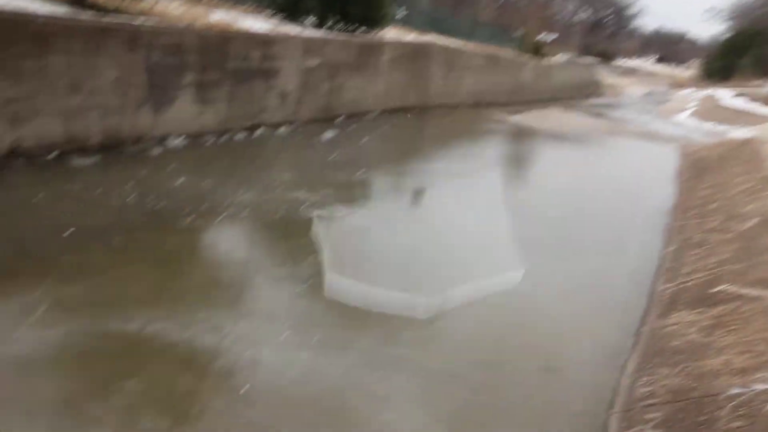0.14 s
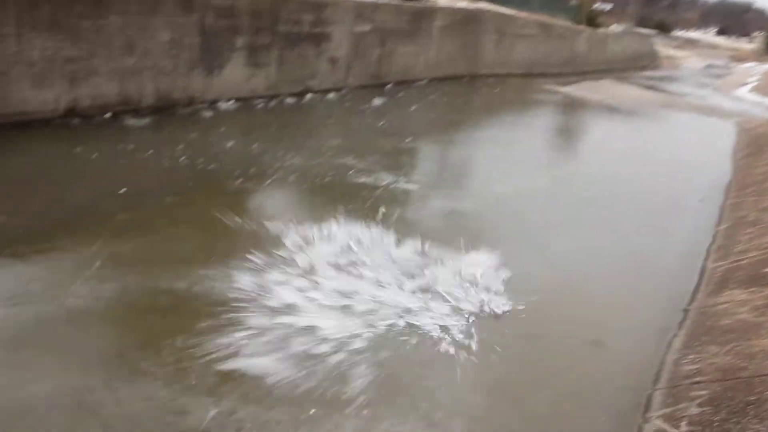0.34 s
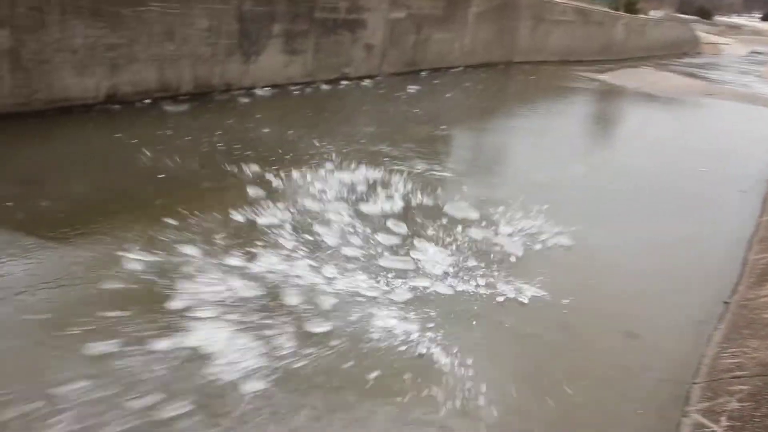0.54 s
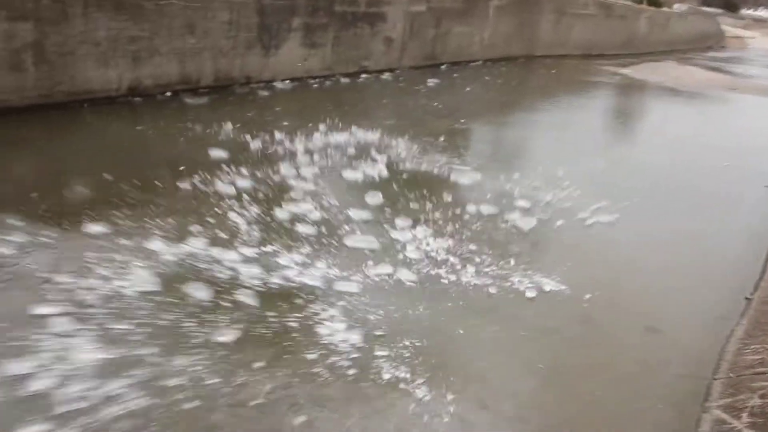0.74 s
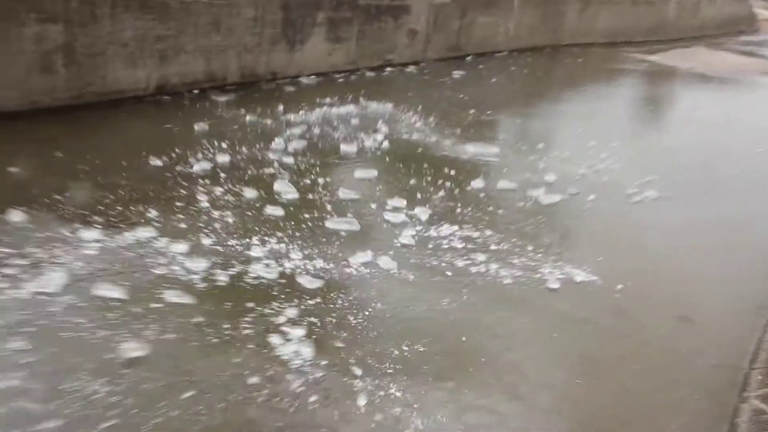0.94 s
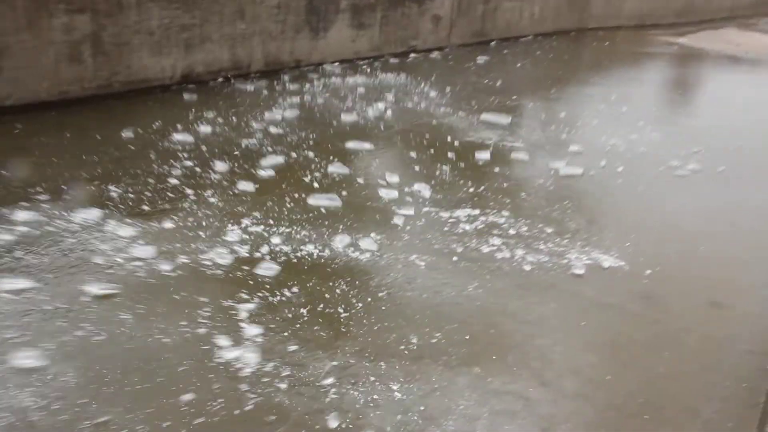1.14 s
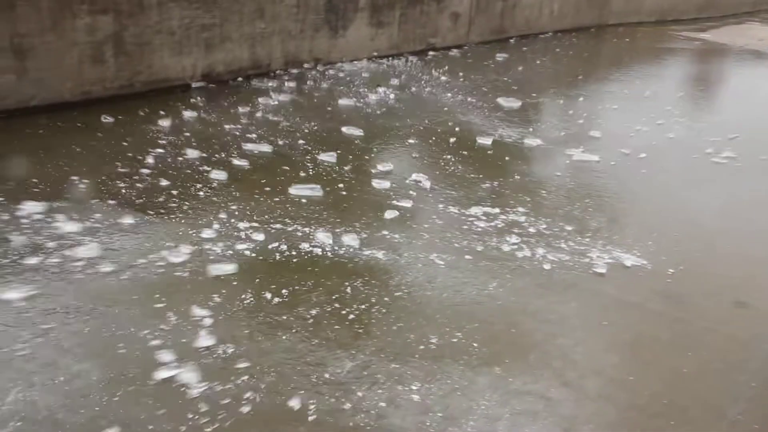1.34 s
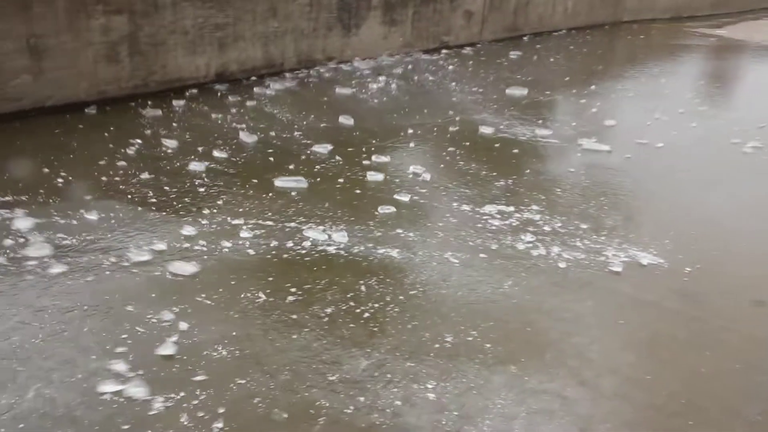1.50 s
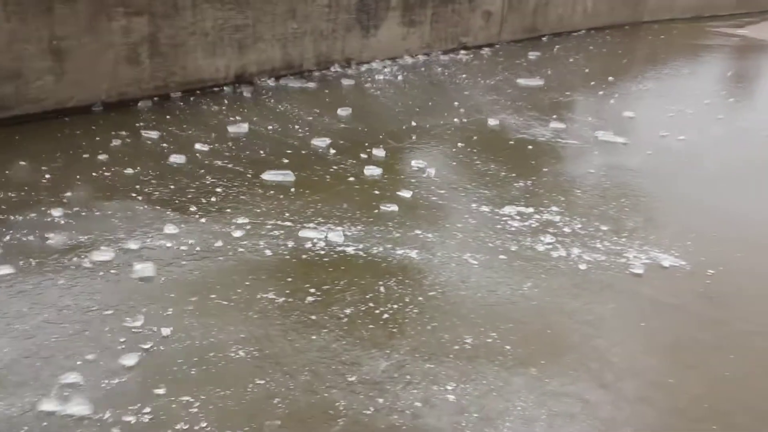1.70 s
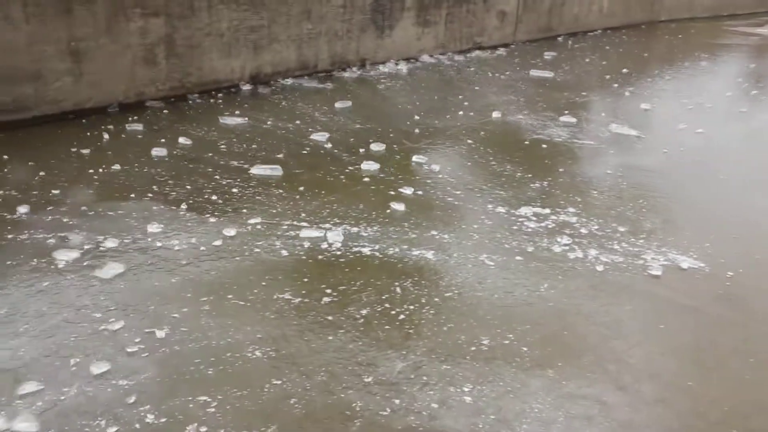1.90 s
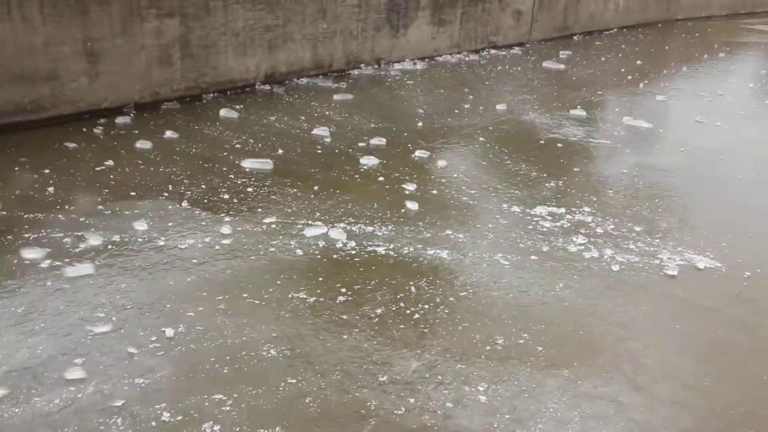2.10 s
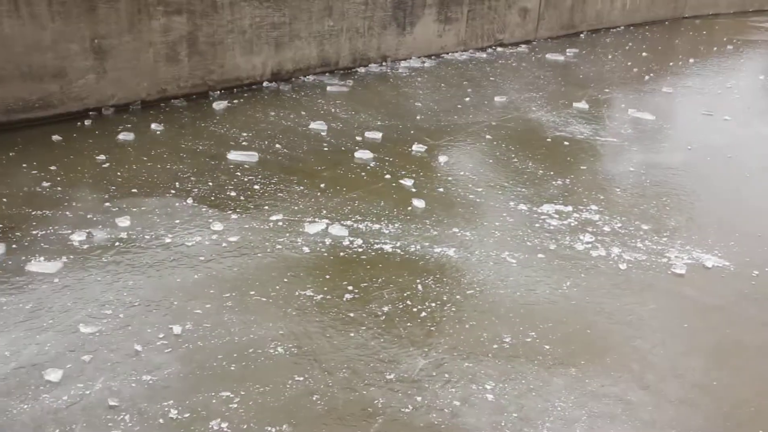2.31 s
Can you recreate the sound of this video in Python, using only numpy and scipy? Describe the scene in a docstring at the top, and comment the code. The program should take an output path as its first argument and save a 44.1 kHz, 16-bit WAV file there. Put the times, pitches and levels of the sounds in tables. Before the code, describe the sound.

A large ice sheet smashes onto a frozen creek: a hard thud and crunching burst of cracks, then bright shards spray, tick, tinkle and knock across the ice; outdoors beside a concrete bank, close microphone with clipped peaks.

```python
"""A big sheet of ice slams onto a frozen creek, a sum of damped modes under a noise burst, and cracks up.
Each crack is a short pressure push with gritty noise, over a crunch of random grains and ringing slabs.
Fragments spray on: dense grains hiss and tick, chunks knock, pieces skid, shards ping and splinters snap.
A concrete bank answers faintly as decaying noise, and air rumbles at the microphone.
The level dips briefly near the end; the recorder clips the peaks and cuts the highest treble."""
import sys
import numpy as np
from scipy import signal
from scipy.fft import rfft, irfft, next_fast_len
from scipy.io import wavfile
from scipy.ndimage import uniform_filter1d, map_coordinates

SR = 44100
rng = np.random.default_rng(int(sys.argv[2]) if len(sys.argv) > 2 else 0)


def generate_wav(sig):
    """Save sig (samples, or channels by samples) to the path in sys.argv[1] as 16-bit PCM at SR."""
    pcm = np.round(np.clip(np.atleast_2d(sig).T, -1, 1) * 32767).astype(np.int16)
    wavfile.write(sys.argv[1], SR, pcm)


N = 103635  # samples
TOP_HZ = 15850  # upper band limit


def amp(db):
    """Level law: decibels to an amplitude ratio."""
    return 10 ** (np.asarray(db) / 20)


def unit(x):
    """Normalisation to an rms of 1."""
    return x / np.sqrt(np.mean(x ** 2) + 1e-20)


def clock(start=0):
    """Time axis: seconds since start, zero before it."""
    return np.maximum(np.arange(N) / SR - start, 0)


def curves(rows):
    """Linear interpolation: one value per sample for each column after the time."""
    seconds, *columns = np.transpose(rows)
    return [np.interp(clock(), seconds, column) for column in columns]


def wobble(rate):
    """Interpolated noise: a smooth random curve with rate knots a second."""
    return map_coordinates(rng.standard_normal(4096), [clock() * rate], mode="wrap")


def colour(x, points):
    """Minimum-phase filtering: a causal filter with the gain of (Hz, dB) points."""
    size = 2 * next_fast_len(N)
    hz, db = np.transpose(points)
    log_hz = np.log(np.fft.rfftfreq(size, 1 / SR) + 1)
    gain_db = np.interp(log_hz, np.log(hz), db)
    cepstrum = irfft(np.log(amp(gain_db)), size)
    # folding the cepstrum onto positive time makes the filter causal
    cepstrum[1:size // 2] *= 2
    cepstrum[size // 2 + 1:] = 0
    return irfft(rfft(x, size) * np.exp(rfft(cepstrum)), size)[:N]


def add(out, s, sound):
    """Superposition: mix a sound in at time s."""
    i = max(round(s * SR), 0)
    out[i:i + len(sound)] += sound[:max(N - i, 0)]


def ring(t, hz, t60):
    """Modal decay: one sine that falls 60 dB in t60 seconds."""
    return np.sin(2 * np.pi * hz * t) * amp(-60 * t / t60)


def grains(rate, low_hz, high_hz, cycles, spread_db, size=400):
    """Random impacts: rate tiny damped collisions a second, of varied pitch, life and strength; rms 1."""
    u = rng.random((16000, 4))[:int(rate * N / SR)]
    hz = np.minimum(low_hz * (high_hz / low_hz) ** u[:, 1:2], SR / 2)
    life = cycles / hz * np.exp(2 * u[:, 2:3] - 1)
    strength = amp(-spread_db * np.log(u[:, 3:] + 0.0099)) * np.sqrt(hz)
    waves = strength * ring(np.arange(size) / SR, hz, life)
    at = (u[:, :1] * N).astype(int) + np.arange(size)
    return unit(np.bincount(at.ravel(), waves.ravel(), N)[:N])


def knocks(rows, cycles, grit_t60, grit_colour):
    """Contact impulse: each is a push of a cycle or two, then a short spit of crushed ice."""
    push, spit = np.zeros(N), np.zeros(N)
    t = np.arange(-SR // 200, SR // 20) / SR
    for s, db, hz, grit_db in rows:
        turns = hz * t
        # the push rises twice as fast as it fades
        shape = np.exp(-np.abs(turns) / np.where(turns < 0, cycles / 2, cycles))
        add(push, s + t[0], amp(db) * shape * np.cos(2 * np.pi * turns))
        rise = np.exp(np.minimum(t, 0) / 0.00098)
        add(spit, s + t[0], amp(db + grit_db - 60 * np.maximum(t, 0) / grit_t60) * rise)
    push = signal.sosfilt(signal.butter(2, 520, "highpass", fs=SR, output="sos"), push)
    return push + spit * unit(colour(rng.standard_normal(N), grit_colour))


# Modes of the struck creek ice. Each row: frequency in Hz, relative level in dB, t60 in seconds.
CREEK_MODES = [(86, -14, 0.036), (158.4, -6, 0.064), (211, 4.5, 0.03), (516, 1.5, 0.025)]
# Spectrum of the bursting sheet. Each row: frequency in Hz, gain in dB.
BURST_COLOUR = [(300, -18), (900, 1.5), (2300, 5), (4500, -2), (9000, -17.5), (16000, -23)]
SLAM_S, BEND_LAG_S, THUD_ATTACK_S = .1982, .0037, 0.00069  # lag of a 1 kHz bending wave
BURST_S, BURST_DB, BURST_HOLD_S, BURST_T60 = .2047, 6.5, 0.0015, 0.016


def slam():
    """Bending-wave dispersion: the creek ice thuds, its lowest mode last, and the sheet bursts as noise."""
    thud = np.zeros(N)
    for hz, db, t60 in CREEK_MODES:
        t = clock(SLAM_S + BEND_LAG_S * np.sqrt(1000 / hz))
        thud += amp(db + 3) * ring(t, hz, t60) * (1 - np.exp(-t / THUD_ATTACK_S))
    burst = unit(colour(rng.standard_normal(N), BURST_COLOUR)) * (clock(BURST_S) > 0)
    return thud + burst * amp(BURST_DB - 60 * clock(BURST_S + BURST_HOLD_S) / BURST_T60)


# Slabs snap off and slap down.
# Each row: time in seconds, level of the push in dB, pitch in Hz, grit in dB relative to the push.
SLAB_CRACKS = [(.2005, -14, 740, -23), (.2148, -0.5, 1620, -7), (.2195, -3.5, 1600, -10),
               (0.2309, -5.5, 1750, -15), (.2342, -4.5, 1840, -17), (0.2386, -4.5, 1570, -12),
               (.2447, -16, 1900, -14), (.2587, -6.5, 1290, -4.5), (0.2647, -3.5, 1020, -13.5),
               (.2765, -14, 2200, -10), (.2858, -4.5, 920, -8), (0.3032, -9, 1710, -10),
               (0.3192, -10, 1330, -6), (.3305, -11.5, 2130, -4), (.3392, -9, 900, -6),
               (.3578, -14.5, 3320, -8)]
# Spectrum of the dense crunch. Each row: frequency in Hz, gain in dB.
CRUNCH_COLOUR = [(60, -37), (130, -15), (240, -4), (350, -10), (480, -14), (900, -3.5), (1700, -3.5),
                 (2500, 2), (5500, -6), (8000, -4.5), (12000, -3), (16000, -24)]
# Spectrum of the crumbling edges. Each row: frequency in Hz, gain in dB.
CRUMBLE_COLOUR = [(150, -35), (500, -12), (900, 0.5), (2200, 2), (5000, -6.5), (12000, -23)]
# Ringing modes of the slabs. Each row: frequency in Hz, relative level in dB, t60 in seconds.
SLAB_MODES = [(790, 0, .18), (896, 0, .18), (940, 4, .22), (980, 2.5, .25), (1590, 1, .16), (1694, 1, .16),
              (2301, 8, 0.13)]
CRUNCH_DB, CRUNCH_FALL_DB_PER_S = -22, 52
CRUNCH_END_S, CRUNCH_RELEASE_DB_PER_S = 0.308, 258  # the extra fall after the end
CRUMBLE_DB, CRUMBLE_LEAD_S, CRUMBLE_TAIL_S = -15, 0.0012, .004  # level relative to each crack


def break_up():
    """Brittle fracture exciting modes: slabs crack over a crunch, crumble at each break and ring briefly."""
    now, t = clock(), clock(BURST_S)
    started = t > 0
    level_db = CRUNCH_DB - CRUNCH_FALL_DB_PER_S * t - CRUNCH_RELEASE_DB_PER_S * clock(CRUNCH_END_S)
    crunch = grains(rate=4000, low_hz=203, high_hz=16000, cycles=1.6, spread_db=3.5)
    crunch = unit(colour(crunch, CRUNCH_COLOUR)) * started * amp(level_db)

    crushing = np.zeros(N)
    for s, db, _, _ in SLAB_CRACKS:
        crushing += amp(db) * np.exp(np.minimum((now - s) / CRUMBLE_LEAD_S, (s - now) / CRUMBLE_TAIL_S))
    crumble = grains(rate=6000, low_hz=600, high_hz=9000, cycles=4.6, spread_db=2.5)
    crumble = unit(colour(crumble, CRUMBLE_COLOUR)) * started * crushing * amp(CRUMBLE_DB)

    grit = [(80, -34), (800, -0.5), (2500, 1.0), (5000, -5.5), (8000, -14), (16000, -17)]  # (Hz, dB)
    cracking = crunch + crumble + knocks(SLAB_CRACKS, cycles=1.1, grit_t60=0.019, grit_colour=grit)
    modes = sum(amp(db) * ring(now[:SR // 2], hz, t60) for hz, db, t60 in SLAB_MODES)
    ringing = signal.fftconvolve(cracking, modes / np.linalg.norm(modes))[:N]
    return cracking + amp(-23.5) * ringing


def patches(x, patchy_db):
    """Random spectral modulation: each time-frequency patch swells and fades within milliseconds."""
    spectrum = signal.stft(x, nperseg=256)[2]
    field = uniform_filter1d(rng.standard_normal(spectrum.shape), size=5, axis=0)
    field = uniform_filter1d(field, size=4, axis=1)
    return unit(signal.istft(spectrum * amp(patchy_db * unit(field)), nperseg=256)[1][:N])


# Course of the spray.
# Each row: time in seconds, mean level of the clatter in dB, mean level of the treble in dB.
SPRAY_LEVELS = [(.3, -57, -61.5), (.39, -38.5, -40.5), (.48, -33, -37), (.6, -31, -26.5), (.72, -27, -23.5),
                (.89, -29.5, -25.5), (1.0, -27, -23), (1.12, -30.5, -23.5), (1.2, -25.5, -21.5),
                (1.42, -29.5, -23.5), (1.56, -27.5, -23.5), (1.64, -30.5, -26.5), (1.71, -27, -21.5),
                (1.86, -32, -28), (1.96, -29.5, -26), (2.15, -32.5, -27.5), (2.35, -30, -29)]
# Spectrum of the bigger bits. Each row: frequency in Hz, gain in dB.
CLATTER_COLOUR = [(100, -35), (220, -15), (350, -17.5), (600, -9.5), (930, 1), (1450, -2.5), (2300, 1.66),
                  (3300, -2), (5000, -1.5), (8000, -7), (16000, -43)]
# Spectrum of the crumbs. Each row: frequency in Hz, gain in dB.
FIZZ_COLOUR = [(1000, -17), (3000, 0.5), (5000, -6), (7000, -4), (9000, -2), (11800, 2), (14000, 0),
               (16000, -1.5)]
CHIPS_DB = -11.5  # coin-sized chips, relative to the clatter


def spray():
    """Superposed random impacts: bits clatter and chips clink, while crumbs tick, tinkle and hiss."""
    clatter_db, fizz_db = curves(SPRAY_LEVELS)
    bits = grains(rate=3500, low_hz=405.0, high_hz=9030, cycles=8.7, spread_db=3.0)
    bits = bits + amp(-2.5) * rng.standard_normal(N)
    chips = grains(rate=130, low_hz=1850, high_hz=6990, cycles=61, spread_db=3.5, size=1200)
    ticks = grains(rate=2500, low_hz=3940, high_hz=15200, cycles=6.1, spread_db=4.5)
    tinkle = grains(rate=1300, low_hz=4520, high_hz=15920, cycles=65, spread_db=4.0)
    crumbs = ticks + amp(-1.5) * tinkle + amp(0.5) * rng.standard_normal(N)
    clumps_db = 1.05 * wobble(130)
    clatter = patches(colour(bits, CLATTER_COLOUR), patchy_db=1.0) + amp(CHIPS_DB) * chips
    fizz = patches(colour(crumbs, FIZZ_COLOUR), patchy_db=0.9)
    return clatter * amp(clatter_db + clumps_db) + fizz * amp(fizz_db + clumps_db)


# Chunks land on the ice.
# Each row: time in seconds, level of the push in dB, pitch in Hz, grit in dB relative to the push.
CHUNK_LANDINGS = [(.566, -14, 2260, -16), (.757, -9.5, 2710, -11), (.774, -12, 2600, -7),
                  (1.174, -12, 2500, -2.5), (1.220, -6.5, 2720, -10), (1.259, -14, 2230, 0),
                  (1.2663, -10, 2050, -7), (1.2693, 0.5, 3730, -20), (1.2795, -10, 1260, -10),
                  (1.312, -6, 2620, -22), (1.358, -8.5, 4800, -13.5), (1.366, -7.5, 1940, -12),
                  (1.5557, -11, 2420, -3.5), (1.604, -12, 3400, -19), (1.615, -12, 2300, -13),
                  (1.699, -8.5, 2650, -7.5), (1.755, -11, 1500, -4.5), (1.771, -5.5, 2570, -9.5),
                  (1.8058, 2, 1760, -18.5), (1.8258, -9, 3020, -15), (1.9014, -5.5, 2280, -9),
                  (2.3361, -8.5, 1280, -12.5)]
CREEK_HZ, CREEK_T60, CREEK_DB = 490, .05, -18  # the creek ice's ring, level relative to the push
CREEK_HEAVY_HZ = 1400  # chunks pitched below this are heavy enough to make the ice ring


def chunks():
    """Impact excitation: larger pieces knock, and the heavy, low-pitched ones ring the creek ice."""
    hollow = np.zeros(N)
    for s, db, hz, _ in CHUNK_LANDINGS:
        if hz < CREEK_HEAVY_HZ:
            creek_hz = CREEK_HZ * rng.uniform(0.9, 1.14)
            hollow += amp(db + CREEK_DB) * ring(clock(s), creek_hz, CREEK_T60)
    grit = [(100, -29.5), (900, -1.5), (2600, 3), (6000, -5.5), (16000, -15)]  # (Hz, dB)
    return hollow + knocks(CHUNK_LANDINGS, cycles=1.0, grit_t60=0.018, grit_colour=grit)


# Small shards ring. Each row: time in seconds, relative level in dB, pitch in Hz.
SHARD_PINGS = [(.648, -12.5, 5850), (.70, -9, 5320), (.756, -9.5, 4250), (0.8796, -7.5, 9400),
               (.92, -9.5, 10700), (1.173, -9, 7500), (1.195, -9, 14600), (1.474, -13.5, 2270),
               (1.499, -11.5, 2680), (1.908, -6.5, 12100), (1.9408, -6.5, 14300), (1.966, -9, 12600),
               (2.005, -13, 6980), (2.186, -13.5, 8150)]
SHARD_T60 = .021  # seconds


def shards():
    """Free vibration: each small shard pings with two damped modes and a brief noise of contact."""
    out, t = np.zeros(N), np.arange(SR // 20) / SR
    for s, db, hz in SHARD_PINGS:
        modes = ring(t, hz, SHARD_T60) + 0.46 * ring(t, hz * rng.uniform(0.62, 1.1), SHARD_T60)
        contact = 0.3 * rng.standard_normal(len(t)) * amp(-60 * t / 0.0059)
        add(out, s, amp(db - 5.0) * (modes + contact))
    return out


# Splinters snap. Each row: time in seconds, peak level in dB, centre pitch in Hz.
SPLINTER_SNAPS = [(0.339, -1, 4440), (0.8017, -7.5, 9000), (1.2693, -6, 4500), (1.5553, -5.5, 5000),
                  (1.5632, -7, 13000), (1.772, -9, 11000), (2.0848, -4, 9500)]
SNAP_T60, SNAP_WIDTH_OCTAVES = 0.0037, 1


def snaps():
    """Band-limited impulse: splinters break with a dry click of filtered, fast-decaying noise."""
    out, t = np.zeros(N), np.arange(SR // 50) / SR
    half = 2 ** (SNAP_WIDTH_OCTAVES / 2)
    for s, db, hz in SPLINTER_SNAPS:
        band = signal.butter(1, [hz / half, min(hz * half, TOP_HZ)], "bandpass", fs=SR, output="sos")
        click = signal.sosfilt(band, rng.standard_normal(len(t)) * amp(-60 * t / SNAP_T60))
        add(out, s, amp(db) * click / np.abs(click).max())
    return out


# Gliding notes: the last slab rings out, and pieces skid over the ice and sing. # Each row: start in seconds,
# length in seconds, rms level at the height of the swell in dB, # first pitch in Hz, last pitch in Hz.
GLIDING_NOTES = [(.298, 0.029, -25, 900, 1048), (0.316, .04, -30, 630, 665), (.705, .03, -31, 5300, 5400),
                 (1.578, .016, -27, 2900, 3900)]
SKID_ROUGH_RAD, SKID_JUDDER_HZ = .5, 243  # random phase depth, and its knots a second


def glides():
    """Tone with phase modulation: each note is rough, swells, glides and fades."""
    out = np.zeros(N)
    for s, length, db, first_hz, last_hz in GLIDING_NOTES:
        hz = np.linspace(first_hz, last_hz, int(length * SR))
        knots = np.arange(len(hz)) * SKID_JUDDER_HZ / SR
        judder = map_coordinates(rng.standard_normal(256), [knots], mode="wrap")
        note = np.sin(2 * np.pi * np.cumsum(hz) / SR + SKID_ROUGH_RAD * judder)
        add(out, s, amp(db + 3) * np.sqrt(np.hanning(len(hz))) * note)
    return out


# Colour of the concrete bank's answer. Each row: frequency in Hz, gain in dB.
BANK_COLOUR = [(70, -30), (160, -7), (260, -6), (800, -0.5), (3000, -2.5), (12000, -7.5)]
BANK_DB, BANK_T60 = -18.5, 0.25


def bank(x):
    """Diffuse reflection: the concrete bank returns a short wash, convolution with decaying noise."""
    t = clock(0.00435)  # delay of the answer in seconds
    tail = colour(rng.standard_normal(N) * (t > 0) * amp(-60 * t / BANK_T60), BANK_COLOUR)
    return amp(BANK_DB) * signal.fftconvolve(x, tail / np.linalg.norm(tail))[:N]


# Air at the microphone. Each row: time in seconds, mean level in dB.
AIR_LEVEL = [(.19, -41.5), (.34, -63), (.55, -51.5), (.66, -46.5), (1.0, -48), (2.35, -45.5)]
# Spectrum of the air. Each row: frequency in Hz, gain in dB.
AIR_COLOUR = [(20, -42), (70, -3), (140, -2.5), (220, -6.5), (400, -16), (1000, -20), (4000, -38),
              (16000, -52)]


def air():
    """Turbulence noise: light wind rumbles at the microphone with an unsteady level."""
    level_db, = curves(AIR_LEVEL)
    return unit(colour(rng.standard_normal(N), AIR_COLOUR)) * amp(level_db + 2.2 * wobble(12.06))


DIP_S, DIP_HOLD_S, DIP_RECOVER_S, DIP_DB = 2.194, 0.036, 0.02, 9
DIP_TREBLE_DB, DIP_TREBLE_S = 33, 0.03  # further loss above 9.5 kHz, and its length


def dip(x):
    """Band-split attenuation: the level dips briefly near the end, most of all in the treble."""
    started = clock(DIP_S) > 0
    depth = started * np.exp(-clock(DIP_S + DIP_HOLD_S) / DIP_RECOVER_S)
    dulled = started * np.exp(-(clock(DIP_S) / DIP_TREBLE_S) ** 10)
    low = signal.sosfiltfilt(signal.butter(4, 9500, fs=SR, output="sos"), x)
    return amp(-DIP_DB * depth) * (low + amp(-DIP_TREBLE_DB * dulled) * (x - low))


def scene():
    """Linear superposition: ice, bank and air in one channel, then the dip."""
    ice = slam() + break_up() + spray() + chunks() + shards() + snaps() + glides()
    return dip(ice + bank(ice) + air())[None]


def record(dry):
    """Saturation and band-limiting: peaks clip at full scale, then a lowpass cuts above TOP_HZ."""
    taps = signal.firwin(301, TOP_HZ, fs=SR, window="blackman")
    return signal.fftconvolve(np.clip(dry, -1.0, 1.0), taps[None], mode="same")


dry = scene()
out = record(dry)
generate_wav(out)
```